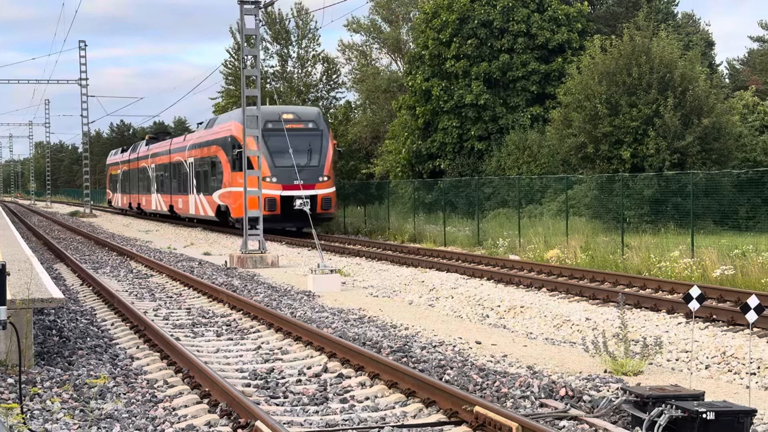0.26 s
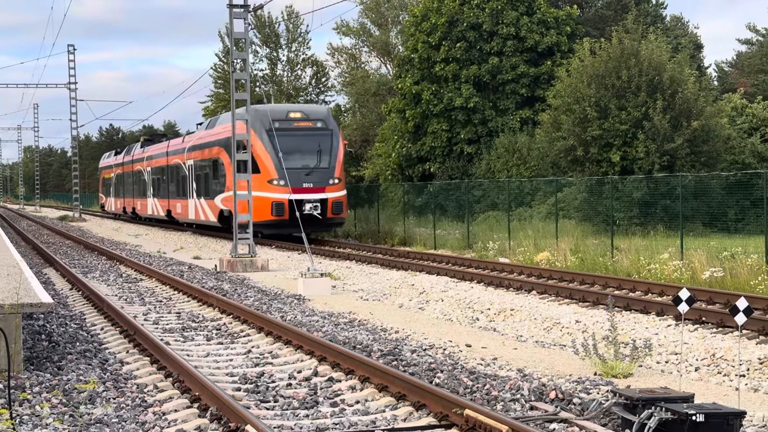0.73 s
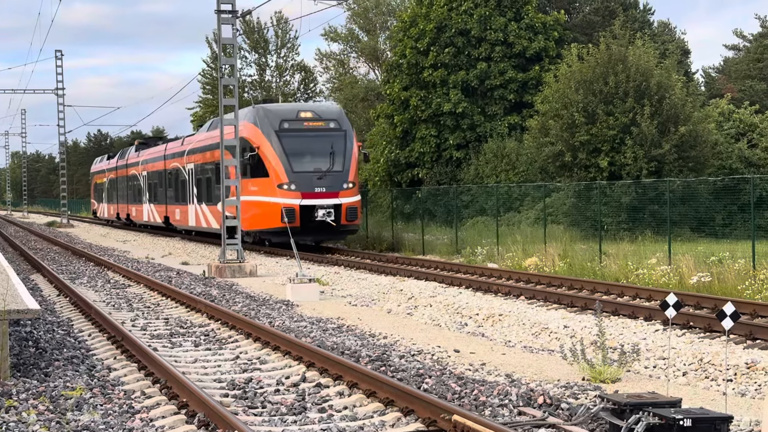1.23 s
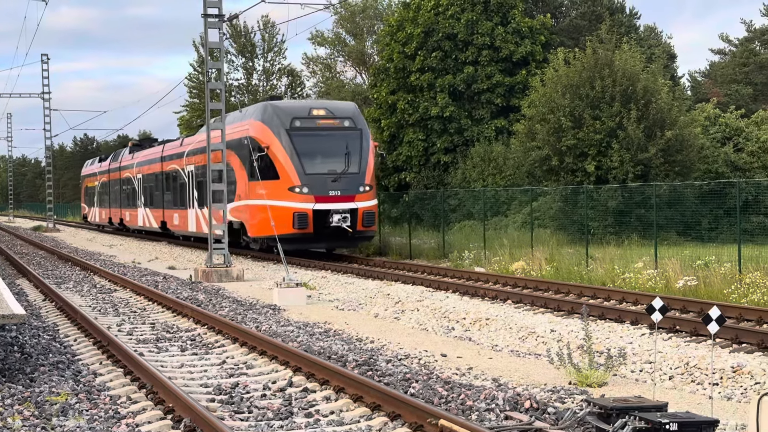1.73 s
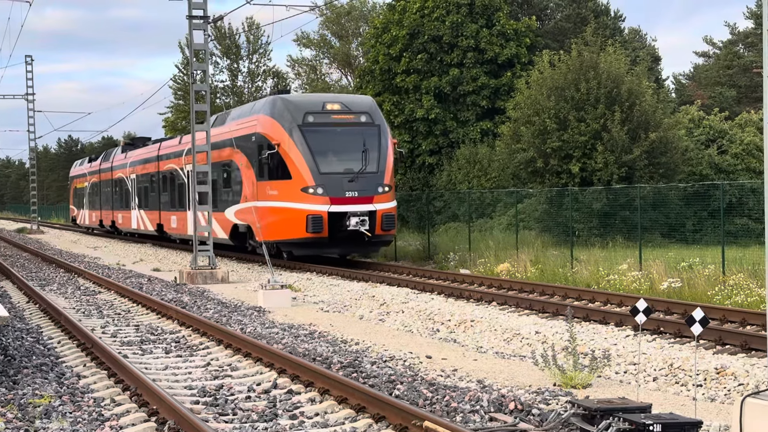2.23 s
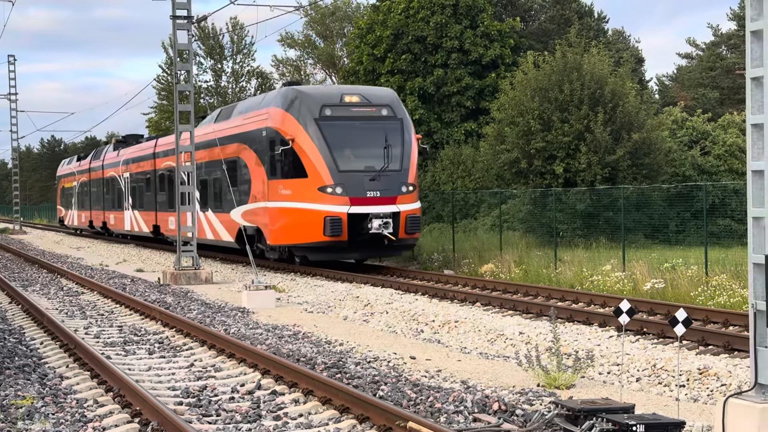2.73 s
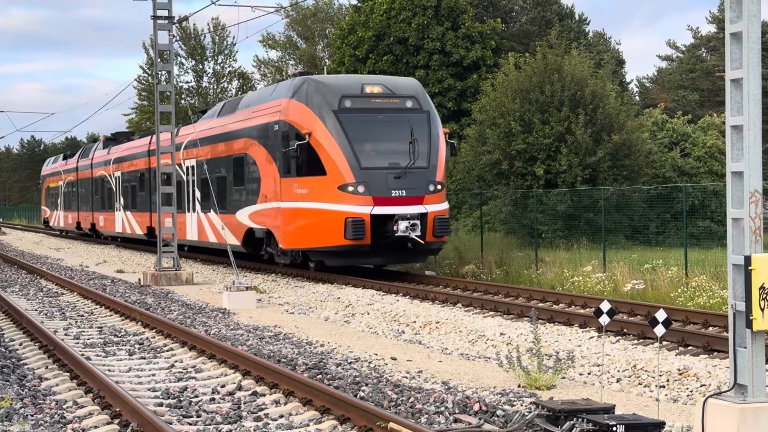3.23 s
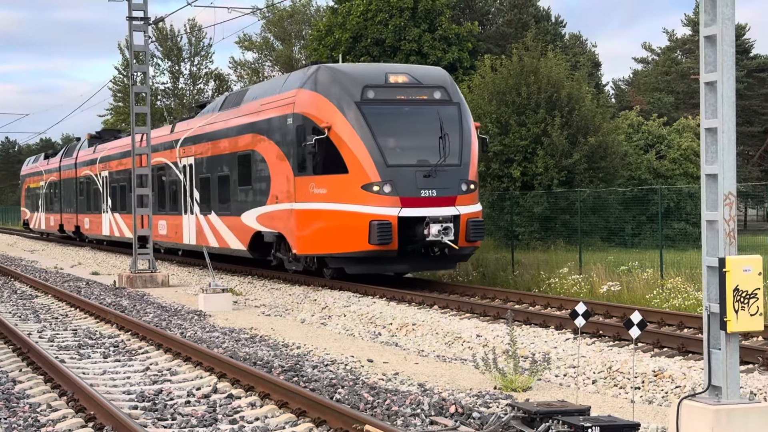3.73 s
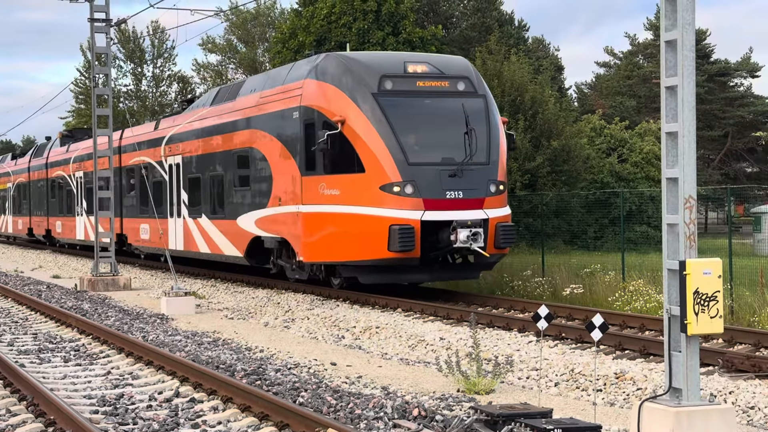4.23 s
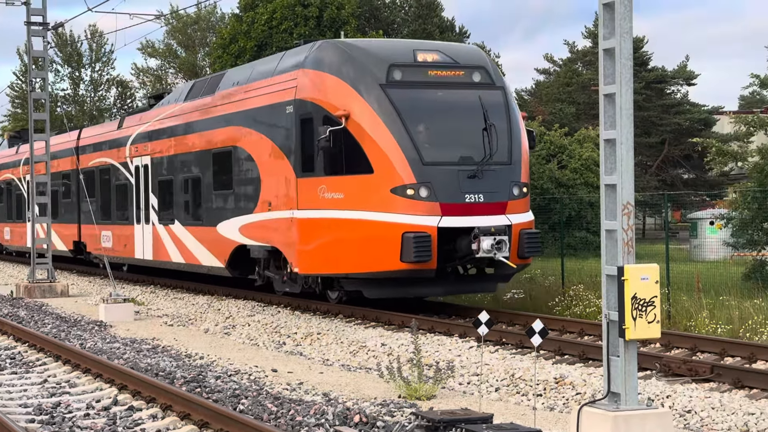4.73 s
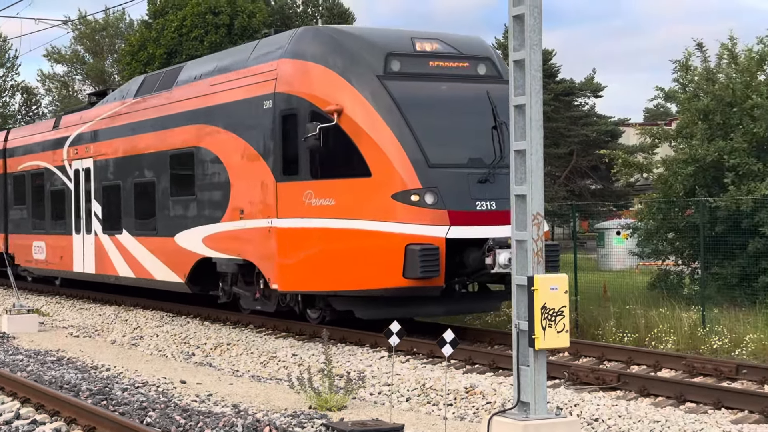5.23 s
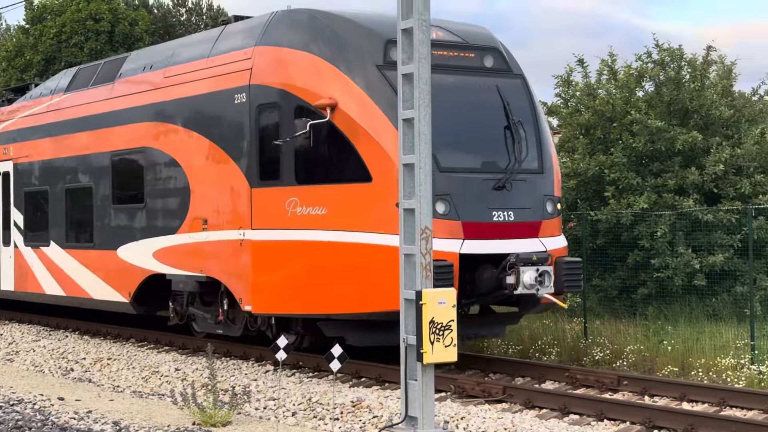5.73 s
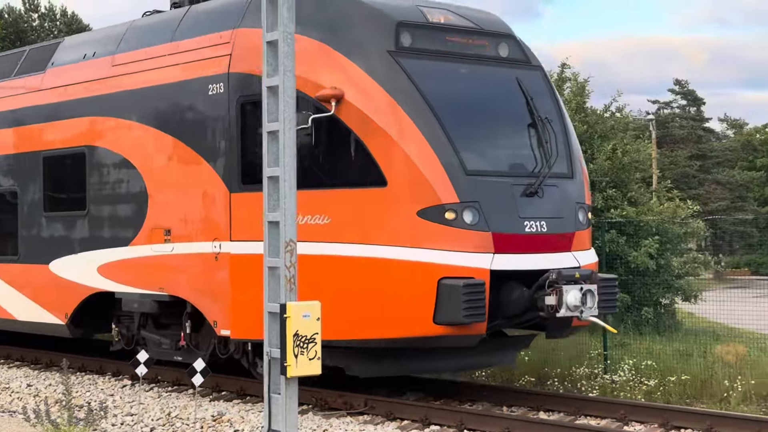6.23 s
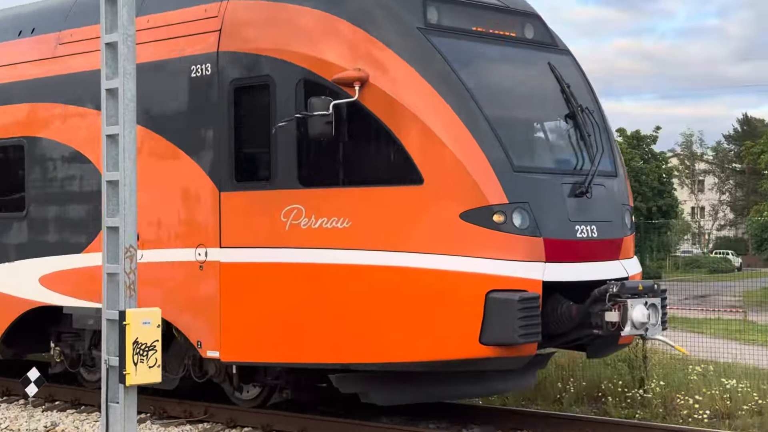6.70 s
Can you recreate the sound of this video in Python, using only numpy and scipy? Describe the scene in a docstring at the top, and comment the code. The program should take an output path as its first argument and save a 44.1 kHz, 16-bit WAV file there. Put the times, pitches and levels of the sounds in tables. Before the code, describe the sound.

Low train rumble and rail hiss swell nearer, two very short bright horn toots ring out and echo, then wheel knocks, squeaks and whine come close.

```python
"""Electric train with two toots

An electric train rolls in close by, slowing gently; its air horn toots twice and trees echo it.
Shaped noise makes the rumble of the bodies, the wheel roar and hiss, and the knocks and ticks.
Wavering tones make the squeaks, the inverters' fixed note and the motor whine that sinks with speed.
The horn sums overtones under an air-pressure envelope."""
import sys
import numpy as np
from scipy import signal
from scipy.fft import rfft, irfft
from scipy.io import wavfile
from scipy.ndimage import uniform_filter1d

SR = 44100
rng = np.random.default_rng(int(sys.argv[2]) if len(sys.argv) > 2 else 0)


def log_audio(samples):
    """Write samples as a 16-bit WAV file to the path given in sys.argv[1]."""
    # one column per channel
    frames = np.atleast_2d(samples).T
    # limit to full scale, then quantise
    limited = np.clip(frames, -1, 1)
    pcm = np.round(limited * 32767).astype(np.int16)
    wavfile.write(sys.argv[1], SR, pcm)


N = 306936
T = np.arange(N) / SR
FREQ = np.arange(N // 2 + 1) * SR / N


# body spectra, far and near: (frequency [Hz], spectral level [dB])
BODY_FAR_SPECTRUM = [(24, -33), (32, -19.5), (42, -14.5), (51, -8), (62, -2.5), (80, 5.5), (92, 1.5),
                     (105, -4), (122, -10.5), (170, -16.5), (230, -31.5)]
BODY_NEAR_SPECTRUM = [(24, -25), (32, -26), (42, -12), (52, 6), (62, 1), (76, 2.5), (88, 1), (104, -2),
                      (125, -12.5), (170, -18.5), (230, -19)]
# rumble: (time [s], deep bass level [dB], body boom level [dB])
RUMBLE_LEVELS = [(0, -52, -34), (.9, -36.5, -35.5), (1.4, -38.5, -34), (1.9, -40, -37), (2.8, -43, -33),
                 (3.3, -44.5, -37), (4.4, -50, -37), (4.7, -41, -34.5), (6.96, -34.5, -33)]


def rumble(near_from_s=4.1, near_by_s=5.5, evenness=0.9, split_hz=60, surge_db=1):
    """Car bodies and sleepers boom over a deep bass; the spectrum changes as the train nears."""
    near = np.clip((T - near_from_s) / (near_by_s - near_from_s), 0, 1)
    far_bodies = np.sqrt(1 - near) * wide_noise(BODY_FAR_SPECTRUM)
    near_bodies = np.sqrt(near) * wide_noise(BODY_NEAR_SPECTRUM)
    deep, boom = split(far_bodies + near_bodies, split_hz)
    deep_db, boom_db = curves(RUMBLE_LEVELS)
    deep_part = even_out(deep, evenness) * undb(deep_db)
    boom_part = even_out(boom, evenness) * undb(boom_db + surge_db * walk(4.1))
    return deep_part + boom_part


def even_out(x, evenness):
    """Many axles share the load, so the level stays fairly even."""
    power = uniform_filter1d(np.mean(x ** 2, axis=0), size=7000)
    return unit(x / np.sqrt(power) ** evenness)


# rolling spectra: (frequency [Hz], spectral level [dB])
ROAR_SPECTRUM = [(90, -19.5), (150, 5), (250, 7), (310, -2.5), (480, -3.5), (750, -6), (1080, -8.5),
                 (1400, -12.5), (1800, -15), (2300, -17), (3200, -34.5)]
BOGIE_SPECTRUM = [(340, -6.5), (450, 6), (620, 4.5), (850, 2), (1250, -14)]
HISS_SPECTRUM = [(1500, -20.5), (2400, 7), (3050, 16), (3600, 8), (4700, 5.5), (5200, 6), (5600, 2.5),
                 (6100, 7.5), (6600, -2.5), (7100, 5), (8000, -22.5), (10000, -3.5)]
SIZZLE_SPECTRUM = [(6500, 3), (8500, 2.5), (9200, -3), (10000, 2.5), (12200, 5), (13000, -10), (15500, -14)]
# (level when alongside [dB], share of the 1 / distance law); rails carry the lows far ahead
ROAR_LEVEL, HISS_LEVEL, SIZZLE_LEVEL = (-45.5, 0.3), (-60.5, 0.56), (-67, 1)


def rolling(roar_rough_db=1.5, hiss_rough_db=0.9, sizzle_rough_db=2.5, judder_db=-7,
            bogie_end_db=-44.5, bogie_db_per_s=6.5, bogie_rough_db=-1.0,
            treble_hz=4800, treble_db=4.0, treble_share=0.29):
    """Rough wheel on rough rail: sleepers roar, running gear judders, rails hiss, contact sizzles."""
    roar = wide_noise(ROAR_SPECTRUM) + undb(judder_db) * judder() * wide_noise(KNOCK_SPECTRUM)
    roar = roar * undb(approach(*ROAR_LEVEL) + roar_rough_db * walk(27))
    # the leading bogie clatters ever more plainly
    bogie_db = bogie_end_db - bogie_db_per_s * (T[-1] - T) + bogie_rough_db * walk(30)
    bogie = wide_noise(BOGIE_SPECTRUM) * undb(bogie_db)
    # the top of the hiss carries less far
    low, top = split(wide_noise(HISS_SPECTRUM), treble_hz)
    hiss = low + top * undb(approach(treble_db, treble_share))
    hiss = hiss * undb(approach(*HISS_LEVEL) + hiss_rough_db * walk(9.7))
    sizzle_db = approach(*SIZZLE_LEVEL) + sizzle_rough_db * walk(8.3)
    return roar + bogie + hiss + wide_noise(SIZZLE_SPECTRUM) * undb(sizzle_db)


def judder(spread_db=5, decay_s=0.034, count=110):
    """Small uneven bumps of the running gear, as an envelope of rms 1."""
    chance = rng.random((count, 2))
    starts = (chance[:, 0] * N).astype(int)
    bumps = np.zeros(N)
    np.add.at(bumps, starts, undb(2 * spread_db * chance[:, 1] ** 2))
    return unit(signal.lfilter([1], [1, -np.exp(-1 / (decay_s * SR))], bumps))


SPEED_M_S, BRAKING_M_S2 = 6.1, .114  # at time 0
PASSES_S, TRACK_M = 7.88, 9.6  # front draws level; distance to the track


def speed(s):
    """Speed of the braking train in m/s."""
    return SPEED_M_S - BRAKING_M_S2 * s


def approach(db, share):
    """Level in dB of a sound that grows as the front of the train draws near."""
    along_m = (PASSES_S - T) * speed((PASSES_S + T) / 2)
    return db + share * 20 * np.log10(TRACK_M / np.hypot(along_m, TRACK_M))


SWITCH_HZ, MOTOR_HZ_PER_M_S = 2034, 438
MOTOR_SLOTS, GEAR_RATIO = 114, .415
# loudest as their bogie faces us: (peak time [s], level [dB], rise [dB/s], fall [dB/s])
MOTOR_PASS, GEAR_PASS = (5.75, -55.5, 2.7, 16), (5.55, -52, 16, 13)
# inverter lines: (multiple of switching rate [-], sideband [stator cycles], level [dB], width [Hz])
INVERTER_LINES = [(1, 0, -3.5, 17), (1, 1.8, -7, 27), (1, -2, -9.5, 37), (1, -0.38, -8.5, 100),
                  (2, -0.37, -16, 79), (2, -1, -19.5, 260), (3, -0.19, -24.5, 25)]
# inverter note: (time [s], level [dB])
INVERTER_LEVELS = [(0, -63.5), (1.3, -61.5), (2.6, -55.5), (3.6, -57.5), (4.8, -51), (5.45, -53),
                   (6.3, -51.5), (6.96, -59)]


def traction(motor_width_hz=28, line_db=-6.0, spread_hz=150, spread_db=-1, gear_width_hz=26):
    """Motor slots and gear teeth follow the speed; inverter sidebands close in on the switching note."""
    motor_hz = MOTOR_HZ_PER_M_S * speed(T)
    motors = undb(line_db) * singing(motor_hz, motor_width_hz)
    motors = motors + undb(spread_db) * singing(motor_hz, spread_hz)
    gears = singing(GEAR_RATIO * motor_hz, gear_width_hz)
    stator_hz = motor_hz / MOTOR_SLOTS
    inverter = 0
    for multiple, sideband, db, width_hz in INVERTER_LINES:
        line_hz = multiple * SWITCH_HZ + sideband * stator_hz
        inverter = inverter + undb(db) * singing(line_hz, width_hz)
    inverter = undb(curves(INVERTER_LEVELS)[0]) * inverter
    return passing(*MOTOR_PASS) * motors + passing(*GEAR_PASS) * gears + inverter


def passing(s, db, rise, fall):
    """Gain of a source that swells towards its peak and fades once it has turned away."""
    return undb(db - rise * np.maximum(s - T, 0) - fall * np.maximum(T - s, 0))


# thud and clank spectra: (frequency [Hz], spectral level [dB])
KNOCK_SPECTRUM = [(60, 7), (130, 9), (260, 3.5), (340, 0.5), (600, 1), (1150, -8.5), (1700, -17.5),
                  (3000, -24), (6000, -47.5)]
CLANK_SPECTRUM = [(500, -7.5), (1300, 4.5), (2500, 7.5), (4500, 2.5), (7000, -1), (11000, -9), (15000, -21)]
# wheels on joints, mostly the two axles of a bogie in turn: (time [s], thud level [dB],
# clank level [dB], decay [s], boom frequency [Hz], boom level [dB], wheel ring frequency [Hz])
JOINT_KNOCKS = [(1.137, -61, -62, 0.045, 205, -30, 1020), (1.594, -48, -59, 0.056, 199, -30, 1010),
                (2.703, -35, -54.5, .04, 138, -26.5, 1104), (3.158, -38.5, -56, 0.088, 142, -22.5, 980),
                (3.573, -51, -59, 0.05, 215, -27, 1050), (4.058, -59.5, -57.5, .05, 215, -29.5, 1030),
                (5.266, -37.5, -41, .022, 161, -26, 1030), (5.327, -41, -77.5, 0.08, 153, -43, 1110),
                (5.763, -38.5, -54, 0.044, 149.5, -23, 1015), (5.989, -36, -55, 0.025, 160, -23, 1020),
                (6.558, -22, -45.5, 0.024, 251, -23, 1214), (6.879, -37.5, -74, 0.045, 266, -41, 1204)]
THUD_RISE_S, CLANK_RISE_S, SHAKE_S = .0013, .0024, .22
RING_LEAD_S, RING_DB = .009, -10  # ring ahead of the thud, level re thud


def joints(boom_lag_s=0.0071, shake_db=-19):
    """At a joint the wheel rings, thuds and clanks, sleeper and frame boom, running gear shakes on."""
    thuds = clanks = tones = 0
    for s, thud_db, clank_db, decay, boom_hz, boom_db, ring_hz in JOINT_KNOCKS:
        thuds = thuds + blow(s, thud_db, decay, THUD_RISE_S)
        thuds = thuds + blow(s, thud_db + shake_db, SHAKE_S, decay)
        clanks = clanks + blow(s, clank_db, decay, CLANK_RISE_S)
        tones = tones + ring(s + boom_lag_s, boom_hz, boom_db, decay=0.018, rise=0.0057)
        tones = tones + ring(s - RING_LEAD_S, ring_hz, thud_db + RING_DB, decay=0.019, rise=0.0015)
    return thuds * wide_noise(KNOCK_SPECTRUM) + clanks * wide_noise(CLANK_SPECTRUM) + tones


def blow(s, db, decay, rise):
    """Envelope of one impact: exponential rise and decay."""
    age = np.maximum(T - s, 0)
    return undb(db) * (1 - np.exp(-age / rise)) * np.exp(-np.minimum(age / decay, 20))


def ring(s, hz, db, decay, rise):
    """One damped resonance."""
    return blow(s, db, decay, rise) * np.sin(2 * np.pi * hz * (T - s))


# tick spectrum: (frequency [Hz], spectral level [dB])
TICK_SPECTRUM = [(2000, -27), (5000, -10), (7500, 7), (10500, 4.5), (13000, 7), (16000, -23)]
# ticks and short scrapes of steel and grit: (time [s], level [dB], decay [s])
GRIT_TICKS = [(0.747, -58, .002), (3.16, -67, .003), (3.232, -62, .04), (5.205, -57, 0.095),
              (6.394, -28.5, 0.0009), (6.402, -54, 0.038), (6.499, -49, 0.0025), (6.52, -57, 0.046),
              (6.532, -49, 0.0018), (6.607, -52, 0.0028), (6.725, -53.5, 0.015), (6.86, -57.5, 0.021)]
# thin high squeaks: (middle [s], half length [s], frequency [Hz], level [dB])
WHEEL_SQUEAKS = [(2.04, 0.13, 5100, -73), (2.529, .04, 8700, -78), (3.03, 0.038, 8700, -71),
                 (4.623, 0.042, 5280, -66), (4.782, 0.031, 5260, -66), (5.008, 0.065, 5160, -62.5),
                 (5.19, 0.075, 5240, -65.5), (6.071, 0.063, 5070, -61), (6.264, 0.032, 5250, -60),
                 (6.46, 0.05, 5320, -70)]


def wheels(rise_share=0.14, squeak_width_hz=180):
    """Grit ticks under the wheels as noise bursts; squeaks are short swells of a wavering tone."""
    ticks = sum(blow(s, db, decay, rise_share * decay) for s, db, decay in GRIT_TICKS)
    squeaks = 0
    for s, half_s, _, db in WHEEL_SQUEAKS:
        squeaks = squeaks + undb(db) * np.exp(-np.minimum(((T - s) / half_s) ** 2, 20))
    middle_s, _, hz, _ = np.transpose(WHEEL_SQUEAKS)
    # pitch switches halfway between squeaks
    squeak_hz = hz[np.searchsorted((middle_s[1:] + middle_s[:-1]) / 2, T)]
    return ticks * wide_noise(TICK_SPECTRUM) + squeaks * singing(squeak_hz, squeak_width_hz)


# toots: (time [s], valve open [s], settled pitch [Hz], level [dB], brightness [dB/octave of overtone])
HORN_TOOTS = [(3.748, 0.058, 720, -11.5, -1), (3.981, .105, 720.7, -13, 1.22)]
# overtones: (multiple of the pitch [-], level [dB])
HORN_OVERTONES = [(1, 0), (2, -17), (3, -30), (4, -23), (5, -33.5), (6, -33.5), (7, -40), (8, -39.5),
                  (9, -43), (10, -48.5), (12, -54.5), (14, -53.5), (16, -50), (18, -63.5), (21, -70.5)]
ATTACK_S, RELEASE_S, DULLING_DB_PER_OCTAVE_S = 0.0043, 0.034, 18
SHARP_HZ, SETTLE_S = 7, 0.039
FLUTTER_DB = .8


def horn(air_db=-38, bright_with_air=1.0):
    """A diaphragm chops air into a flared pipe: the note starts sharp and bright, settles and dulls."""
    out = np.zeros(N)
    multiple, overtone_db = np.transpose(HORN_OVERTONES)
    k = np.arange(1, 22)[:, None]
    octaves = np.log2(k)
    wobble = .0013 * walk(120)
    air = noise(response([(60, -48.5), (300, -25.0), (800, 7.0), (1300, -24.0),
                          (3000, -22.5), (12000, -30.5)]))
    for s, open_s, hz, db, bright_db in HORN_TOOTS:
        on = (T > s - .04) & (T < s + .3)
        age = T[on] - s
        pressure = np.exp(-np.maximum(age - open_s, 0) / RELEASE_S) / (1 + np.exp(-age / ATTACK_S))
        pitch_hz = (hz + SHARP_HZ * np.exp(-(age / SETTLE_S) ** 2)) * (1 + wobble[on])
        phase = 2 * np.pi * np.cumsum(pitch_hz) / SR
        # the bounce off the ballast shifts as the train moves: each partial flutters on its own
        flutter = signal.resample(rng.standard_normal(size=(len(k), 18)), on.sum(), axis=1)
        tilt_db = octaves * (bright_db - DULLING_DB_PER_OCTAVE_S * age)
        gains = undb(np.interp(k, multiple, overtone_db) + tilt_db + FLUTTER_DB * flutter)
        # overtones above the octave need full pressure: last to come, first to go
        gains = gains * pressure ** (bright_with_air * np.log2(np.maximum(k - 1, 1)))
        note = np.sqrt(2) * np.sum(gains * np.sin(k * phase), axis=0)
        out[on] += undb(db) * pressure * (note + undb(air_db) * air[on])
    return out


# returned by the trees: (frequency [Hz], gain [dB])
FOLIAGE_RESPONSE = [(720, -0.5), (1440, -8.5), (2200, 0), (3000, -9), (5500, -1.5), (12000, -5.5)]
# distinct echoes off fence and trees: (delay [s], level [dB])
TREE_ECHOES = [(.11, -27), (.187, -15.5)]
WASH_ONSET_S, WASH_RISE_S = .11, .06
WASH_TAILS = ((-21.5, 1.3), (-26, 4.3))  # near, far: (level [dB], t60 [s])


def trees(x, sway_rad=0.81, aslant_db=-5):
    """Echoes, a wash from the nearest trunks and a long faint tail; leaves soak up treble."""
    age = np.maximum(T - WASH_ONSET_S, 0)
    build = np.minimum(age / WASH_RISE_S, 1)
    paths = 0
    for db, t60 in WASH_TAILS:
        tail = build * np.exp(-np.log(1000) * age / t60) * rng.standard_normal((2, N))
        paths = paths + undb(db) * unit(tail) / np.sqrt(N)
    dulled = rfft(x) * response(FOLIAGE_RESPONSE)
    delays = sum(undb(db) * np.exp(-2j * np.pi * FREQ * delay) for delay, db in TREE_ECHOES)
    echoes = irfft(dulled * delays, N)
    # the horn moves: the wash flutters by a wandering phase
    wash = signal.hilbert(irfft(dulled * rfft(paths), N))
    wash = np.real(wash * np.exp(1j * sway_rad * walk(35)))
    # direct sound arrives aslant: quarter-cycle-shifted copy in the side
    aslant = undb(aslant_db) * irfft(1j * rfft(x), N)
    return stereo(x + echoes + wash[0], 2 * wash[1] + echoes + aslant)


def undb(db):
    """Decibels to gain."""
    return 10 ** (np.asarray(db) / 20)


def unit(x):
    """Scale to rms 1."""
    return x / np.sqrt(np.mean(x ** 2))


def curves(table):
    """Every column of a table, joined by straight lines in time."""
    s, *columns = np.transpose(table)
    return [np.interp(T, s, c) for c in columns]


def response(points):
    """Gain at every frequency from (Hz, dB) points."""
    hz, db = np.transpose(points)
    return undb(np.interp(np.log(FREQ + 1), np.log(hz), db))


def noise(gain):
    """Noise of rms 1 with the given spectrum."""
    return unit(irfft(rfft(rng.standard_normal(N)) * gain, N))


def walk(rate_hz):
    """Slow random wander of rms 1."""
    return noise(np.exp(-(FREQ / rate_hz) ** 2))


def split(x, hz):
    """The parts of a sound below and above a frequency."""
    low = irfft(rfft(x) / (1 + (FREQ / hz) ** 20), N)
    return low, x - low


# side against mid: (frequency [Hz], gain [dB])
SIDE_WIDTH = [(30, -23), (70, -31), (160, -19), (350, -11.5), (650, -9), (1400, -5.5), (2400, -8.5),
              (3200, -8.5), (4600, -30), (8000, -37.5), (10000, -34.5)]


def stereo(mid, loose):
    """Mid is common to both channels; scattered sound makes the side, opposite in each."""
    side = irfft(response(SIDE_WIDTH) * rfft(loose), N)
    return np.array([mid + side, mid - side])


def wide_noise(points):
    """Stereo coloured noise, falling steeply beyond the ends of its spectrum."""
    low_skirt = np.minimum(FREQ / points[0][0], 1) ** 3
    high_skirt = np.minimum(points[-1][0] / (FREQ + 1), 1) ** 5
    gain = response(points) * low_skirt * high_skirt
    return stereo(noise(gain), noise(gain))


def singing(hz, width_hz):
    """A tone from several units over many moving paths: its strength and phase waver."""
    phase = 2 * np.pi * np.cumsum(hz * np.ones(N)) / SR
    carrier = np.exp(1j * phase)
    knots = np.arange(0, N, 32)
    blur = np.exp(-(np.fft.fftfreq(len(knots), knots[1] / SR) / (width_hz / 2)) ** 2 / 2)
    shape = (2, len(knots))
    chance = rng.standard_normal(shape) + 1j * rng.standard_normal(shape)
    paths = np.fft.ifft(np.fft.fft(chance) * blur)
    return stereo(*(unit(np.real(np.interp(np.arange(N), knots, p) * carrier)) for p in paths))


def scene():
    """The train on its track, and its horn among the trees."""
    return rumble() + rolling() + traction() + joints() + wheels() + trees(horn())


# left minus right: (frequency [Hz], level difference [dB])
CHANNEL_LEAN = [(60, 0.37), (380, .5), (720, 1.5), (1300, 1.8), (2100, -1), (2500, 1.5), (3000, -2),
                (4200, 0)]
TOP_HZ = 15700


def record(dry):
    """Channels lean by band and drift out of phase in the top octave; the very top is cut."""
    twist = np.exp(1j * np.pi * np.maximum(FREQ - 8000, 0) * .00033)
    left = np.sqrt(response(CHANNEL_LEAN)) / twist
    soft_ends = signal.windows.tukey(N, .001)
    heard = irfft(rfft(dry * soft_ends) * np.array([left, 1 / left]), N)
    return signal.sosfilt(signal.ellip(8, .2, 70, TOP_HZ, fs=SR, output="sos"), heard)


dry = scene()
out = record(dry)
log_audio(out)
```